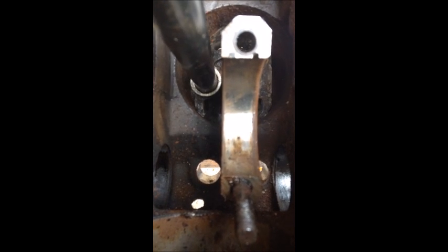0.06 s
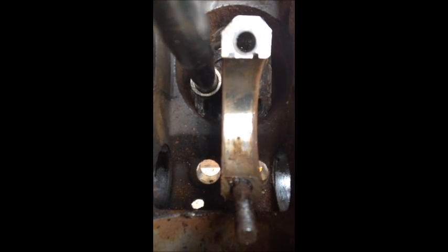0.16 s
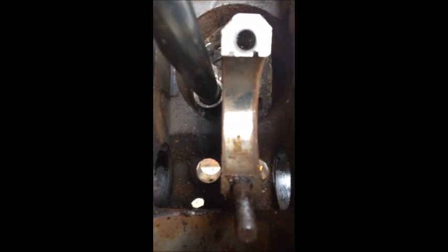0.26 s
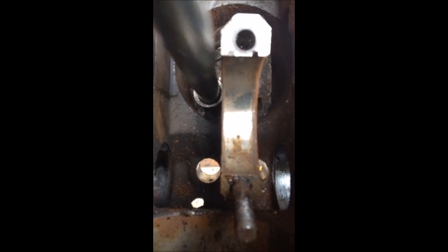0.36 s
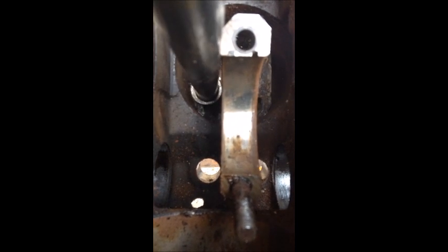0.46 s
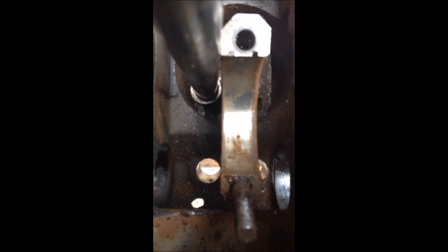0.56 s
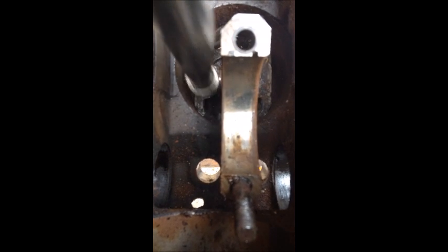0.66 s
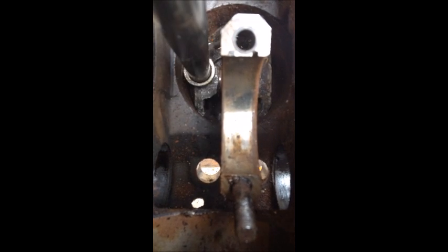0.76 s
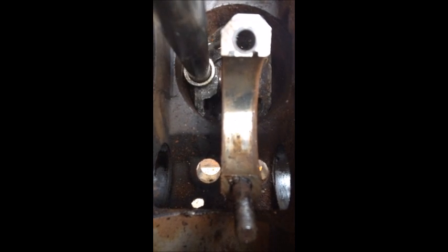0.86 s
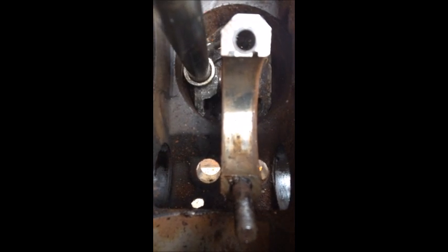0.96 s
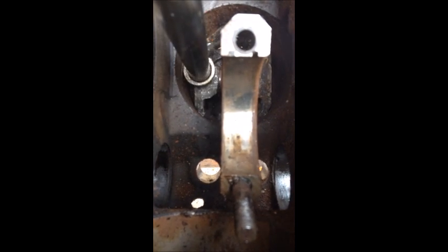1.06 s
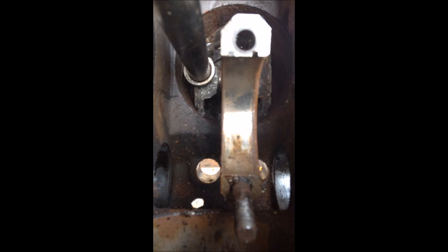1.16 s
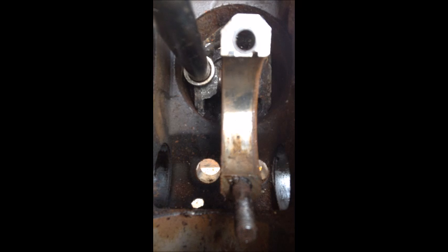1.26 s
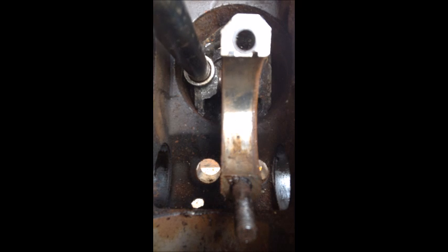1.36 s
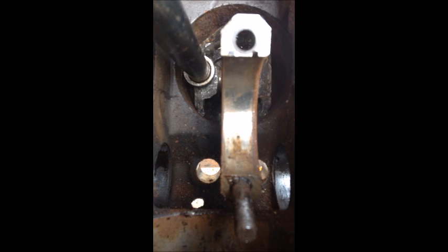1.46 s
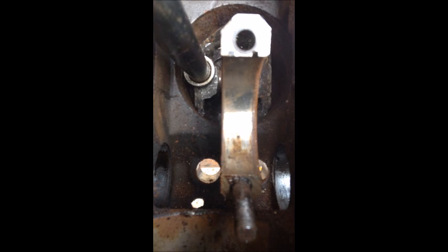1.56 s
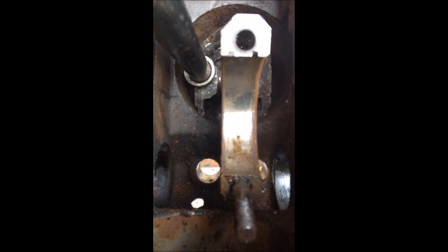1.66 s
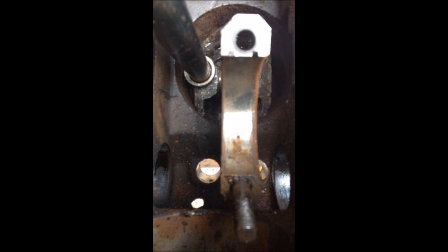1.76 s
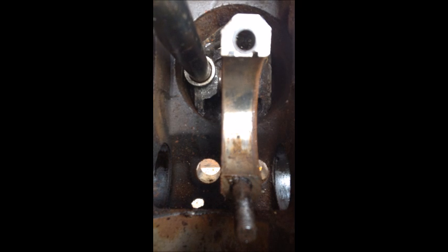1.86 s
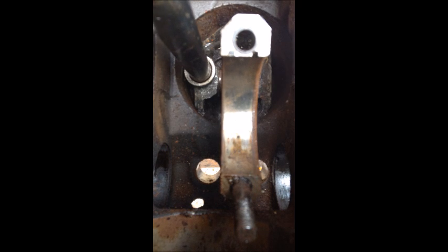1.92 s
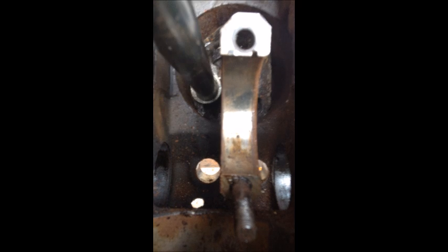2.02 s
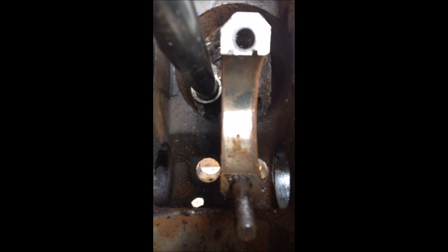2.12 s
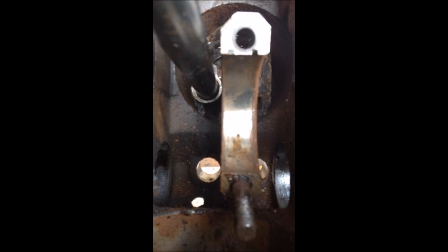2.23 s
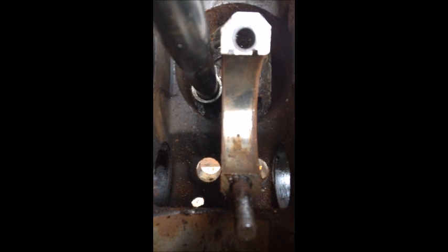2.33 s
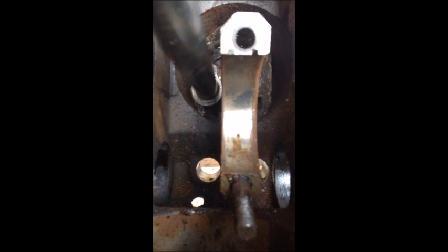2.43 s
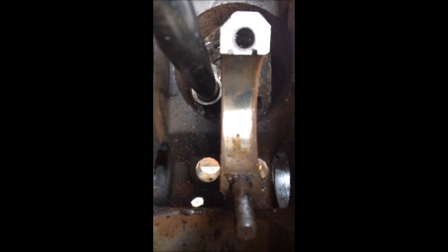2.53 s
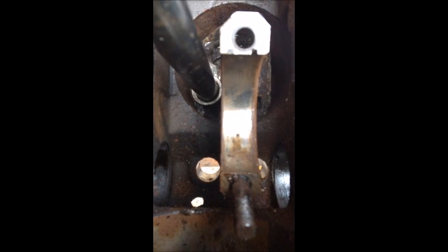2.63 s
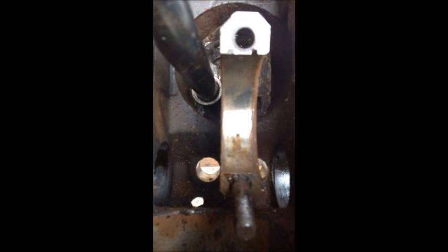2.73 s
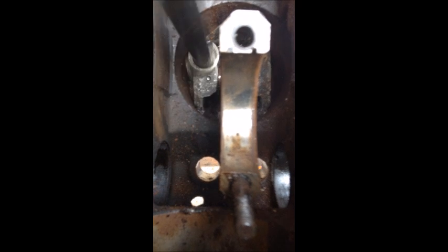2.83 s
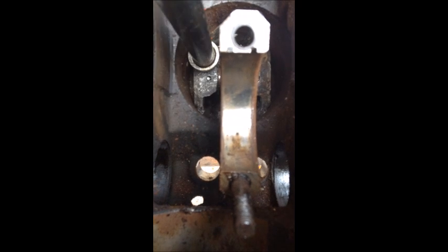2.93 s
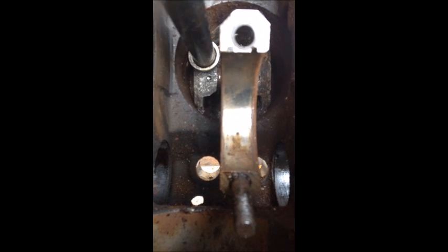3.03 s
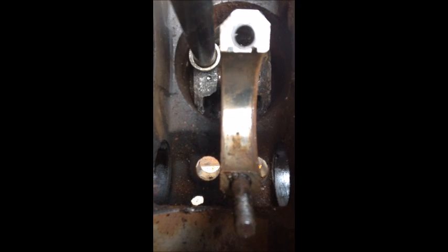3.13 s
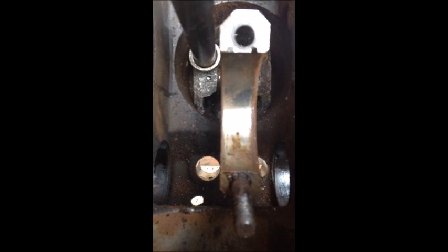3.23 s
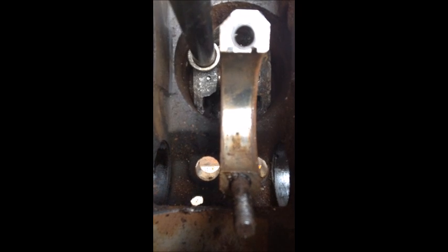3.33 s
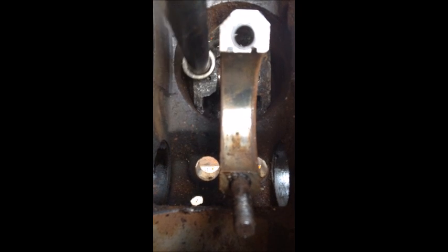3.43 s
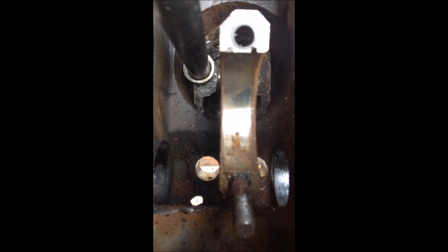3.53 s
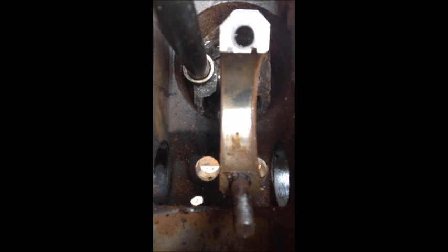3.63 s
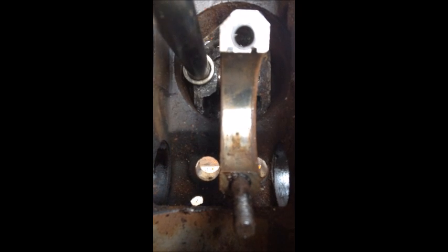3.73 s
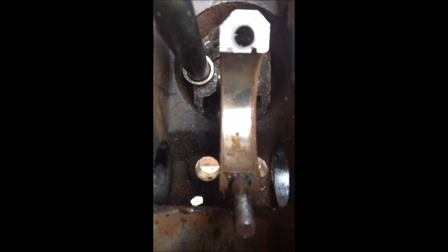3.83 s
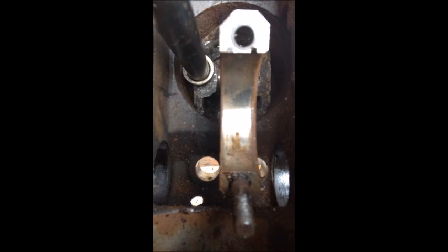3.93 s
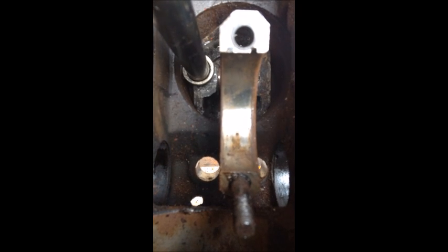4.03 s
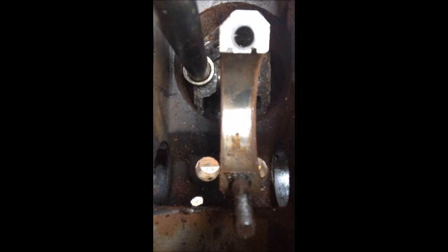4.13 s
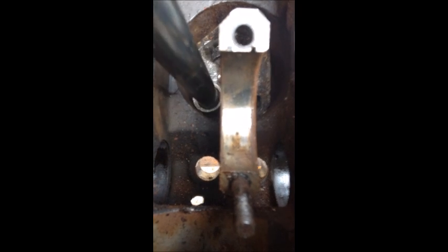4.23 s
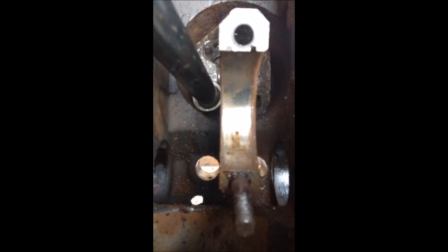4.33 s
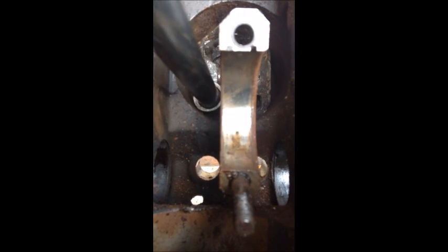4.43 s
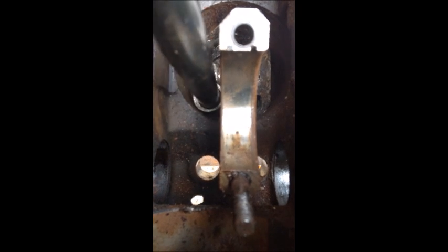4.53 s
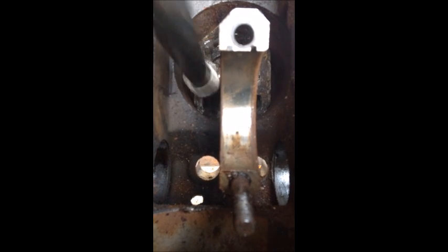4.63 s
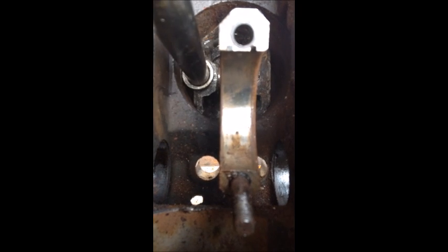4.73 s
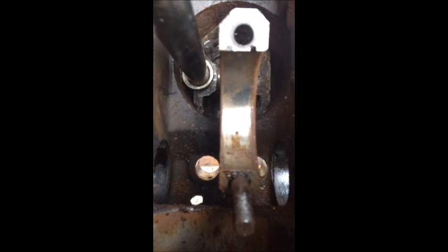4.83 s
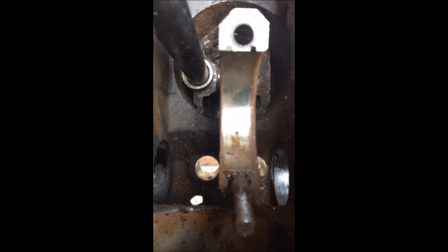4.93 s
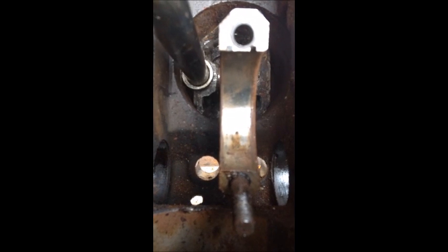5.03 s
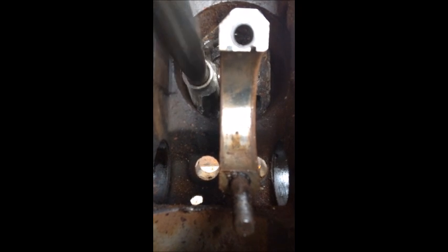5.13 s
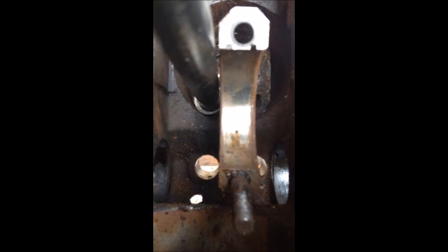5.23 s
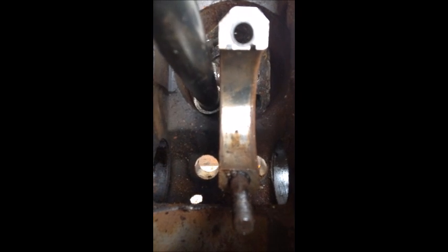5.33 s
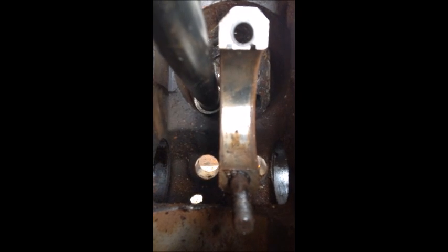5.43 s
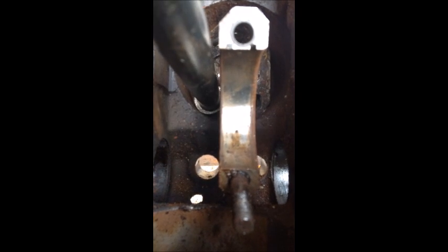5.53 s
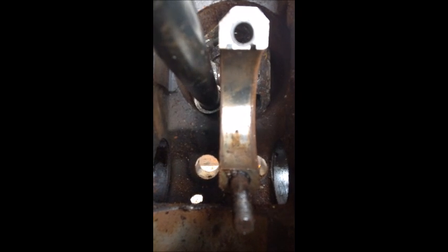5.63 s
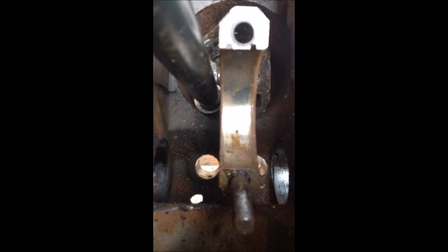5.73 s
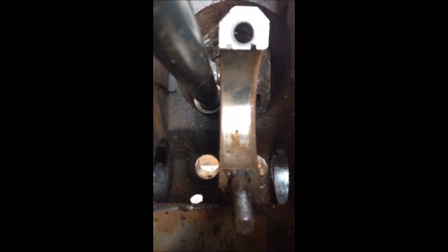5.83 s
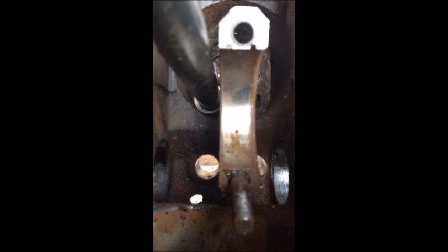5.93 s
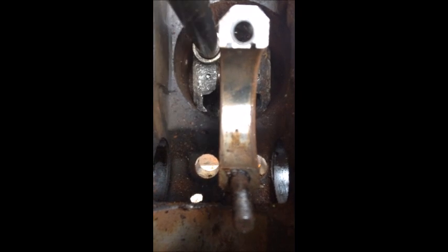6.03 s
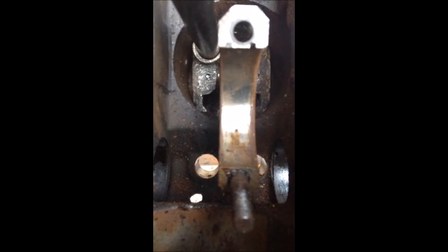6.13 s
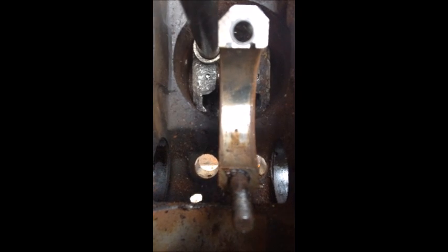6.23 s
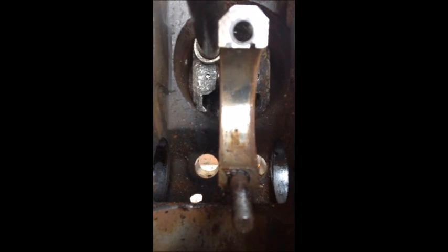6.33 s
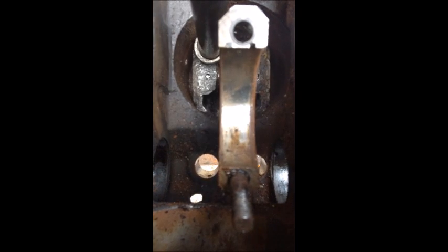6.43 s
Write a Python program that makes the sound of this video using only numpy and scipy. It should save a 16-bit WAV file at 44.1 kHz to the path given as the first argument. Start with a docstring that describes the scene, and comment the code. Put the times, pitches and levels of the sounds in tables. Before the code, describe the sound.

Close, irregular metal-on-metal hammering, sharp clanks and lighter rebounds, with a deep throbbing hum swelling back after blows in a workshop.

```python
"""Hammer blows on a stuck piston

A hammer drives a steel pole against a stuck piston in an iron engine block, close to a phone in a workshop.
Blows are noise bursts plus damped modes of pole, block and stand; a noise tail is the shop's answer.
Two long modes hum, dipping at many blows and swelling back, probably as the phone's gain ducks and recovers;
filtered noise bursts are grit ticks as the pole is shifted. Steady shaped noise is the workshop air.
The phone limits and clips the blows."""
import sys
import numpy as np
from scipy import signal
from scipy.fft import rfft, irfft, next_fast_len
from scipy.io import wavfile
from scipy.ndimage import uniform_filter1d, minimum_filter1d

SR = 44100
rng = np.random.default_rng(int(sys.argv[2]) if len(sys.argv) > 2 else 0)


def inscribe(sig):
    """Save sig as 16-bit PCM at rate SR to the path in sys.argv[1].

    A 1-D sig is mono; a 2-D sig holds one channel per row.
    Samples are clipped to [-1, 1] before scaling.
    """
    pcm = np.round(np.clip(np.atleast_2d(sig).T, -1, 1) * 32767)
    wavfile.write(sys.argv[1], SR, pcm.astype(np.int16))


N = 285327


def amp(db):
    """Decibel law: level in dB to amplitude ratio."""
    return 10 ** (np.asarray(db) / 20)


def unit(x):
    """Normalization to a root mean square of 1."""
    return x / np.sqrt(np.mean(x ** 2) + 1e-20)


def along(points, hz):
    """Interpolation of (Hz, value) points on a logarithmic frequency axis."""
    point_hz, value = np.transpose(points)
    return np.interp(np.log(hz + 1), np.log(point_hz + 1), value)


def filtered(x, response):
    """Linear filtering: the spectrum times a response of frequency."""
    size = next_fast_len(len(x) + 8192)
    hz = np.fft.rfftfreq(size, 1 / SR)
    return irfft(rfft(x, size) * response(hz), size)[:len(x)]


def white(length):
    """White noise: equal mean power at all frequencies."""
    return rng.standard_normal(length)


def dying_noise(t60s, spectrum, damping, length):
    """Frequency-dependent damping: noise starting near rms 1 whose bands each die at their own rate."""
    hz, t, bands = signal.stft(white(length), SR, nperseg=128)
    colour = unit(amp(along(spectrum, hz)))
    t60 = damping * along(t60s, hz)
    decay = amp(-60 * t / t60[:, None])
    return signal.istft(bands * decay * colour[:, None], SR, nperseg=128)[1][:length]


def ringing(modes_hz, modes, t, damping, rise_s, scatter_db, rough):
    """Modal superposition: damped sines, newly weighted per blow; loose contacts make level and phase wander."""
    hz = np.reshape(modes_hz, (-1, 1))
    level_db, t60 = np.transpose(modes)[..., None]
    level_chance, phase_chance = rng.standard_normal((2, len(modes), 1))
    knots = rng.standard_normal((2, len(modes), 48)).astype(np.float32)
    steps = np.repeat(knots, len(t) // 48 + 1, axis=2)
    level_wander, phase_wander = rough * uniform_filter1d(steps, size=500, axis=2)[..., :len(t)]
    decay = np.exp((-np.log(1000) * t / (damping * t60)).astype(np.float32))
    phase = (2 * np.pi * (hz * t + phase_chance)).astype(np.float32) + phase_wander
    strength = amp(level_db + scatter_db * level_chance)
    waves = strength * (decay * (1 + level_wander) * np.sin(phase))
    return waves.sum(0) * (1 - np.exp(-t / rise_s))


# Clatter spectrum: pitch_hz [Hz], density_db [relative dB per Hz]
CLATTER_SPECTRUM = [(35, -63), (60, -22), (198, -5), (748, -11), (1170, -11.5), (1540, -13.5), (2090, -6.5),
                    (2700, -8), (12100, -16), (14500, -68), (16000, -55)]
# Clatter damping, before scaling by looseness: pitch_hz [Hz], t60_s [s]
CLATTER_DECAY = [(200, 0.072), (800, 0.16), (2000, 0.2), (5000, 0.1), (14000, 0.068)]
SPIKE_HZ, SPIKE_GRIT = 3320, .6  # spike pitch and its share of noise
RATTLE_DB, RATTLE_S = 1.5, .003  # lumps in the clatter from loose contacts: depth and grain length


def contact_crack(spike_db, clatter_db, looseness, t):
    """Impact excitation: a brief contact force excites a wide band, and looser contacts clatter longer."""
    tone = np.sin(2 * np.pi * SPIKE_HZ * t)
    spike = amp(spike_db - 60 * t / 0.002) * (tone + SPIKE_GRIT * white(len(t)))

    tilt_db = 0.073 * (clatter_db + 9.5)  # dB per octave: a harder blow has a brighter clatter
    burst = amp(5.5 + 2 * tilt_db - 60 * t / 0.023) * uniform_filter1d(white(len(t)), size=2)
    colour = [(hz, level + tilt_db * np.log2(max(hz, 500) / 3000)) for hz, level in CLATTER_SPECTRUM]
    grains = uniform_filter1d(white(len(t)), size=int(RATTLE_S * SR))
    lumps = amp(RATTLE_DB * unit(grains))
    clatter = amp(8.0) * dying_noise(CLATTER_DECAY, colour, looseness, len(t))
    clatter *= 1 - np.exp(-t / 0.0015)
    return spike + amp(clatter_db) * (burst + lumps * clatter)


# Mode pitches of block, pole, upper ring and lead modes: pitch_hz [Hz]
BLOCK_PITCHES = [614, 858, 916, 1105, 1153, 1204]
POLE_PITCHES = [1686, 1836, 1960, 2196, 2366]
UPPER_PITCHES = [2541, 3128, 3265, 3585, 3903, 4743, 5050]
LEAD_PITCHES = [2030, 2104, 2853, 3487, 6008]
# Their strengths and damping, before scaling by looseness: level_db [relative dB], t60_s [s]
BLOCK_MODES = [(-3.5, 0.18), (-13.5, 0.38), (-2.5, 0.25), (-10, 0.38), (-7, 0.31), (2, 0.3)]
POLE_MODES = [(-6.5, 0.33), (-7, 0.39), (-5.5, 0.27), (10, 0.079), (-4.5, 0.24)]
UPPER_MODES = [(-0.5, 0.24), (-6.5, 0.2), (6.5, 0.026), (-5, 0.092), (-7.5, 0.062), (0.5, 0.061),
               (-12.5, 0.06)]
# Lead modes: level_db [dB over the blow level each follows], t60_s [s, before scaling by looseness]
LEAD_STRENGTHS = [(-0.8, 0.53), (1.45, 0.22), (-10.5, 0.31), (9, 0.13), (-22, 0.34)]
# decay factors: at no looseness, and growth with looseness
RING_TIGHT, RING_LOOSENS = 0.3, 0.36
LEAD_TIGHT, LEAD_LOOSENS = 0.5, 0.17  # the lead modes care less


def metal_rings(tone_db, block_db, pole_db, clang_db, upper_db, looseness, t):
    """Free vibration: the struck pole and block ring at their own modes, which build up after contact."""
    damping = RING_TIGHT + RING_LOOSENS * looseness
    lead_damping = LEAD_TIGHT + LEAD_LOOSENS * looseness
    followed_db = tone_db, clang_db, block_db, upper_db, block_db  # one for each lead mode
    lead = [(level + struck, t60) for (level, t60), struck in zip(LEAD_STRENGTHS, followed_db)]
    rings = amp(block_db) * ringing(BLOCK_PITCHES, BLOCK_MODES, t, damping,
                                    rise_s=0.015, scatter_db=0.5, rough=0.43)
    rings += amp(pole_db) * ringing(POLE_PITCHES, POLE_MODES, t, damping,
                                    rise_s=0.003, scatter_db=5.5, rough=0.75)
    rings += amp(upper_db) * ringing(UPPER_PITCHES, UPPER_MODES, t, damping,
                                     rise_s=0.00073, scatter_db=1.5, rough=0.87)
    rings += ringing(LEAD_PITCHES, lead, t, lead_damping, rise_s=0.0083, scatter_db=1.0, rough=0.27)
    return rings


# Thump mode pitches: pitch_hz [Hz]
THUMP_PITCHES = [162, 300, 350]
# Thump modes, before the damping factor: level_db [relative dB], t60_s [s]
THUMP_MODES = [(1.5, 0.28), (-2.5, 0.5), (-9.5, 0.58)]
STAND_HZ, STAND_MODE = 208.5, (0.0032, 0.73)  # level in dB; t60 in s before the damping factor


def stand_thump(thump_db, stand_db, t):
    """Low-frequency resonance: the blow sets the stand thumping and ringing."""
    thump = amp(thump_db) * ringing(THUMP_PITCHES, THUMP_MODES, t, 0.73,
                                    rise_s=0.0035, scatter_db=-4.0, rough=0.8)
    stand = amp(stand_db) * ringing(STAND_HZ, [STAND_MODE], t, 0.87,
                                    rise_s=0.011, scatter_db=2.5, rough=0.34)
    return thump + stand


# Shop reverberation, before the damping factor: pitch_hz [Hz], t60_s [s]
SHOP_DECAY = [(200, 1), (800, 0.85), (2000, 0.57), (5000, 0.49), (14000, 0.33)]


def shop_answer(sound):
    """Reverberation as convolution: the sound excites a new unit-energy tail of dying noise."""
    spectrum = [(50, -38.5), (300, 1.5), (16000, 7.0)]  # Hz, relative dB
    tail = dying_noise(SHOP_DECAY, spectrum, 0.96, len(sound))
    return signal.fftconvolve(sound, tail / np.linalg.norm(tail))[:len(sound)]


# Blows, taps and rebounds: start_s [s], then relative levels [dB]: spike_db, tone_db (long tone),
# clatter_db, block_db, pole_db, clang_db, upper_db, thump_db, stand_db;
# looseness [decay factor of the clatter, also lengthens the rings]
BLOW_EVENTS = [(-.12, -5.5, -6, -0.5, 2.5, -1, -5, -6.5, -13, -9, 1.12),
               (.3, 17.5, -12, 7, 9.5, -17, 13.5, 3.5, -1.5, -9, 1.03),
               (.535, 0.5, -10, -12.5, -25, -20.5, -6.5, -24, -44, -23, 0.36),
               (0.549, -6, -30, -23, -44, -16, -27, -11, -48, -31, 0.66),
               (.591, -20.5, -49, -36.5, -48, -27, -8.5, -34, -58, -38, 0.46),
               (.812, -1, -31, -16.5, -26, -21, -14.5, -17.5, -54, -33, .5),
               (1.671, -14.5, -21.5, -15.5, -16.5, -16.5, -19, -17, -23.5, -19.5, 0.61),
               (1.721, -23.5, -45, -24, -24, -37, -21, -31, -42, -25, 0.27),
               (2.122, -4.5, 2.5, 5.5, 10, -1.5, 10, -7, -11.5, -16, 0.92),
               (2.547, 1, -11, -3, 4, 2, 6.5, -8.5, -25.5, -13.5, 0.78),
               (2.914, -3.5, -9, -12.5, 1, -24, -24, -20, -34, -47, .94),
               (2.922, 5.5, 0.5, 5.5, 15, 9, 17.5, 4.5, -8, -13, 0.73),
               (2.951, -2, -2.5, 4, -10.5, -22.5, 15, 3, -16, -38, 0.38),
               (3.445, 6.5, -8.5, -12.5, -16, -9.5, -16, -27, -22.5, -22, .64),
               (3.643, -11.5, -24, -13, -12, -24, -26, -17.5, -31, -17.5, 0.38),
               (3.852, 5.5, -8, -7.5, -11.5, -4, -3, -9.5, -22.5, -13.5, .66),
               (4.319, -0.5, 4.5, 5, 12.5, -2.5, 10.5, 6, -6, -11, 0.82),
               (4.334, 13, -16, 4.5, -4.5, -15.5, 16, -10.5, -24, -23, 0.9),
               (4.769, 5.5, -24.5, -13, -23, -20.5, -27, -14.5, -53.5, -19.5, 0.56),
               (4.79, 6.5, -19.5, -12, -8, -13.5, -21, -17.5, -22.5, -32.5, 0.75),
               (5.252, -14, -24, -13.5, -33, -15.5, -20, -14, -30, -33, 0.64),
               (5.258, 6, -23, 4, 4.5, 4, 9, 4.5, -10, -14, 0.97),
               (5.275, 3.5, -32, -18, 2, -24, -6, -1, -20, -23.5, 0.53),
               (5.703, -5, -8, -1, 4, -1, 16, 1.5, -26.5, -16.5, 0.75),
               (6.075, 6, -10, 8.5, 12, -3, 13.5, -7, -7, -11.5, 0.88)]
PRE_ROLL = SR // 4  # samples before the start, where an earlier blow lands


def blows():
    """Superposition in time: each blow adds its contact, rings, thump and the shop's answer."""
    out = np.zeros(N + PRE_ROLL + SR)
    t = np.arange(SR // 2) / SR
    fade = np.clip((.5 - t) / 0.073, 0, 1)
    for (start_s, spike_db, tone_db, clatter_db, block_db, pole_db, clang_db, upper_db,
         thump_db, stand_db, looseness) in BLOW_EVENTS:
        contact = contact_crack(spike_db, clatter_db, looseness, t)
        rings = metal_rings(tone_db, block_db, pole_db, clang_db, upper_db, looseness, t)
        reverb = amp(-20) * shop_answer(contact + amp(-11.0) * rings)
        low = stand_thump(thump_db, stand_db, t)
        first = PRE_ROLL + round(start_s * SR)
        out[first:][:len(t)] += (contact + rings + reverb + low) * fade
    return out[PRE_ROLL:PRE_ROLL + N]


# Swells of the two long modes: start_s [s], hum_db and upper_hum_db [rms dB before swell and sag],
# swell_s [s], sag_db_per_s [dB/s, negative grows], rocking [initial depth, 0-1]
SWELLS = [(-.12, -26.5, -44, 0.12, -2, 0), (.3, -21.5, -35, 0.11, -12, 0.02),
          (.535, -42.5, -53.5, 0.042, 2, 0.2), (2.122, -21.5, -38, 0.13, 1, 0.04),
          (2.545, -22.5, -42.5, .13, 4.5, 0.17), (2.922, -12, -38, 0.21, 6.5, 0.3),
          (3.445, -16.5, -40, 0.05, 3, 0.12), (3.643, -19.5, -47, 0.018, -15, 0.04),
          (3.852, -16.5, -43.5, 0.088, 8.5, .07), (4.321, -13.5, -34.5, .12, -0.5, 0.34),
          (4.769, -14, -37, 0.083, 3.5, .07), (5.256, -16.5, -28, .1, 75, 0),
          (5.703, -21.5, -59, 0.1, 13.5, 0.1), (6.072, -7.5, -35.5, 0.13, 6.5, 0.36)]
HUM_HZ, UPPER_HUM_HZ, ROCK_HZ, SHAKE_HZ = 261.8, 408.5, 11.8, 28.5
DIP_S, ROCK_T60_S = 0.0095, 8.2  # time constant of the dip at a blow; decay time of the rocking


def hum():
    """Modulated modes: the pole rocks after a blow, which makes the low hum throb and buzz at its overtones."""
    t = np.arange(N) / SR
    level, upper, depth, since = np.zeros((4, N))
    ends = [row[0] for row in SWELLS[1:]] + [N / SR]
    for (start_s, hum_db, upper_db, swell_s, sag_db, rocking), end in zip(SWELLS, ends):
        age = np.maximum(t - start_s, 0)
        # the hum dips at a blow and swells back, probably as the phone's gain ducks and recovers
        swell = 1 - np.exp(-(age / swell_s) ** 2)
        dip = np.exp(-np.maximum(t - end, 0) / DIP_S)
        shape = swell * amp(-sag_db * age) * dip
        level += amp(hum_db) * np.sqrt(2) * shape
        upper += amp(upper_db) * np.sqrt(2) * shape
        depth = np.where(t > start_s, rocking, depth)
        since = np.where(t > start_s, age, since)
    depth = depth * amp(-60 * since / ROCK_T60_S)
    rock = np.sin(2 * np.pi * ROCK_HZ * since + 4.84)
    shake = np.sin(2 * np.pi * SHAKE_HZ * since)
    phase = 2 * np.pi * HUM_HZ * t
    octave = depth * (0.31 * rock + 0.18 * shake) * np.sin(2 * phase)
    third = 0.16 * level ** 2 * np.sin(3 * phase)  # with level below: grows with the cube of the swing
    low = level * ((1 + depth * rock) * np.sin(phase) + octave + third)
    return low + upper * np.sin(2 * np.pi * UPPER_HUM_HZ * t)


# Grit and light touches of the pole: start_s [s], level_db [relative dB], centre_hz [Hz],
# knock_db [dB, before level_db is added], t60_s [s]
TOUCHES = [(0.2495, -56, 4900, -18, 0.017), (0.8, -32.5, 2250, -9, 0.11), (1.311, -42, 9000, -16, 0.016),
           (1.319, -51, 11570, -20, 0.043), (1.3553, -40, 6000, -34, 0.014),
           (1.381, -35.5, 5470, -20, 0.016), (1.449, -41, 2860, 15.5, 0.059), (1.458, -52, 7600, -20, .03),
           (1.464, -42, 3240, -24, 0.063), (1.468, -49, 11100, -20, .03), (1.482, -42, 8600, -16, 0.027),
           (4.668, -51, 5000, -26, 0.022), (4.717, -39.5, 7140, -24, 0.027),
           (4.732, -30.5, 2310, -14.5, 0.045), (5.199, -54.5, 5000, -17, 0.039)]


def ticks():
    """Resonant filtering: short noise bursts pass a wide resonance, with dull knocks of varied strength."""
    out = np.zeros(N + SR)
    t = np.arange(SR // 10) / SR
    for start_s, level_db, centre_hz, knock_db, t60_s in TOUCHES:
        width_hz = centre_hz * .6

        def resonance(hz):
            """Second-order band-pass response."""
            return 1j * hz * width_hz / (centre_hz ** 2 - hz * hz + 1j * hz * width_hz)

        envelope = amp(6 - 60 * t / t60_s) * (1 - np.exp(-t / 0.0026))
        grit = unit(filtered(white(len(t)), resonance)) * envelope
        knock = amp(knock_db - 60 * t / 0.049) * np.sin(2 * np.pi * 500 * t)
        out[round(start_s * SR):][:len(t)] += amp(level_db) * (grit + knock)
    return out[:N]


# Workshop background spectrum: pitch_hz [Hz], density_db [relative dB per Hz]
AIR_SPECTRUM = [(24, -106.5), (40, -67), (184, -14), (231, -9.5), (269, -14.5), (328, -15.5), (444, -14.5),
                (570, -33), (614, -22.5), (732, -23.5), (1630, -26.5), (2830, -33.5), (13100, -56),
                (16000, -62)]


def air():
    """Spectral shaping of noise: steady workshop sound, slightly patchy in time and frequency."""
    bands = signal.stft(white(N), nperseg=512)[2]
    field = uniform_filter1d(rng.standard_normal(bands.shape), 5, 0)  # smooth over frequency
    field = uniform_filter1d(field, 12, 1)  # smooth over time
    patchy = signal.istft(bands * amp(0.9 * unit(field)), nperseg=512)[1][:N]
    shaped = filtered(patchy, lambda hz: amp(along(AIR_SPECTRUM, hz)))
    return amp(-40.5) * unit(shaped)


def scene():
    """Linear superposition of all sources on one channel."""
    return (blows() + hum() + ticks() + air())[None]


# Treble limit of the sound: pitch_hz [Hz], gain_db [dB]
TREBLE_LIMIT = [(14800, -1), (15300, -1.5), (15600, -30)]
BASS_CORNER_HZ, TOP_HZ = 25, 16100
LIMIT, HOLD_S, LAG_S = 2.3, 0.018, 0.00037  # limiter: amplitude, hold and reaction time


def record(dry):
    """Nonlinear transduction: bass cut, a limiter that reacts late and leaves peaks to clip, then band limit."""
    x = filtered(dry[0], lambda hz: (1j * hz / (BASS_CORNER_HZ + 1j * hz)) ** 2)
    needed_gain = np.minimum(1, LIMIT / (np.abs(x) + 1e-9))
    hold, lag = int(HOLD_S * SR), int(LAG_S * SR)
    # both windows look back only
    held_gain = minimum_filter1d(needed_gain, size=hold, origin=(hold - 1) // 2)
    limited = x * uniform_filter1d(held_gain, size=lag, origin=(lag - 1) // 2)
    clipped = limited / (1 + np.abs(limited / .95) ** 6) ** (1 / 6)  # soft clip
    heard = filtered(clipped, lambda hz: amp(along(TREBLE_LIMIT, hz)) * (hz < TOP_HZ))
    return np.clip(heard, -1, 1)[None]


dry = scene()
out = record(dry)
inscribe(out)
```